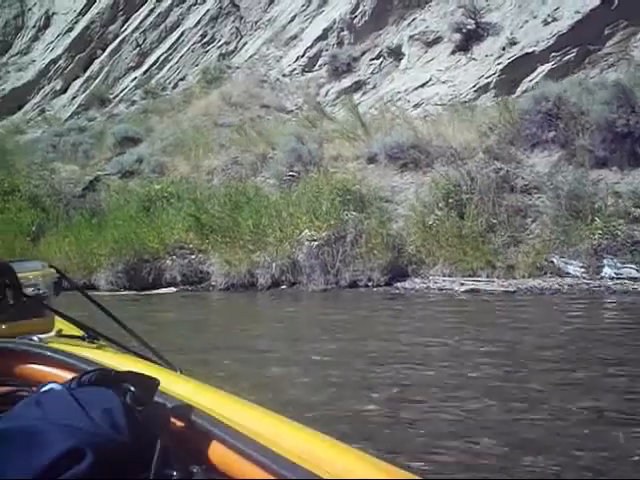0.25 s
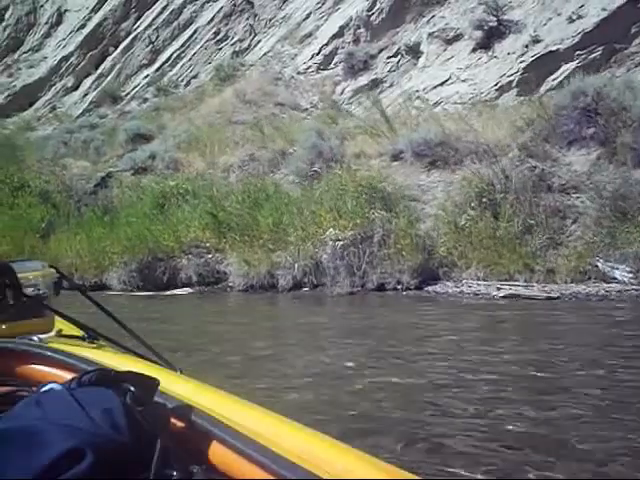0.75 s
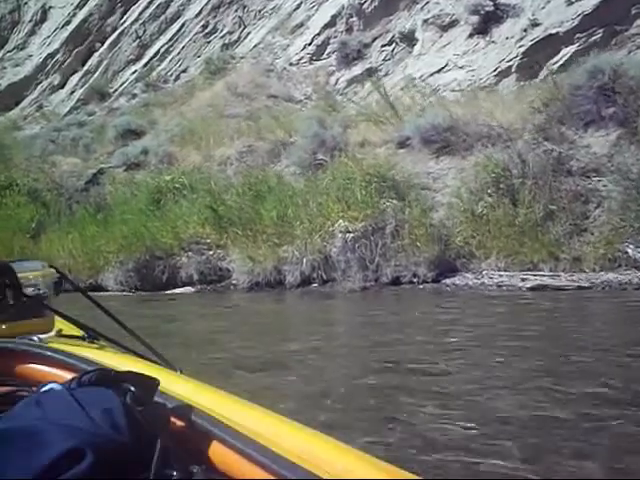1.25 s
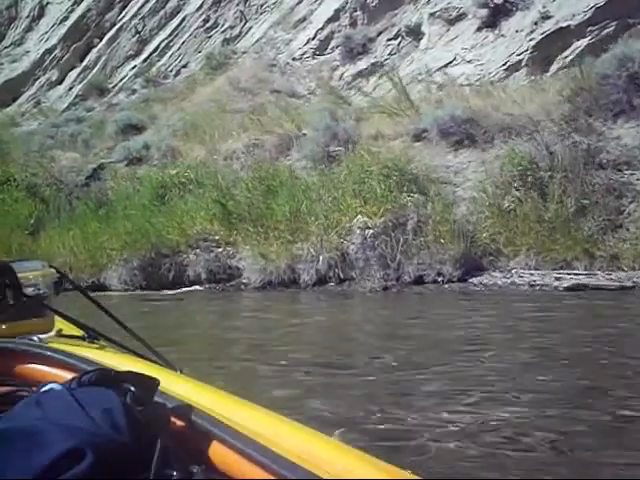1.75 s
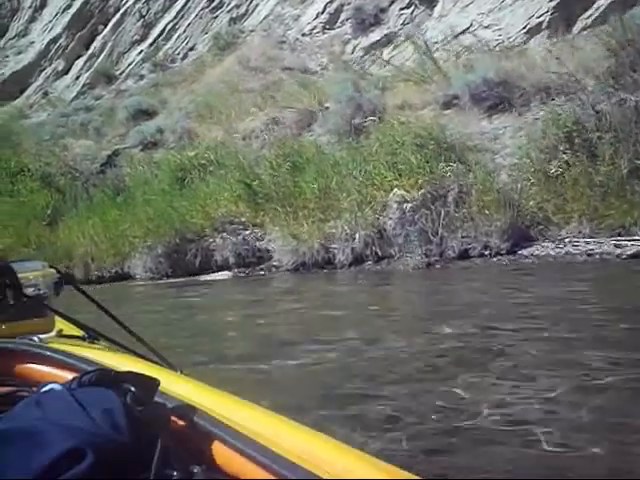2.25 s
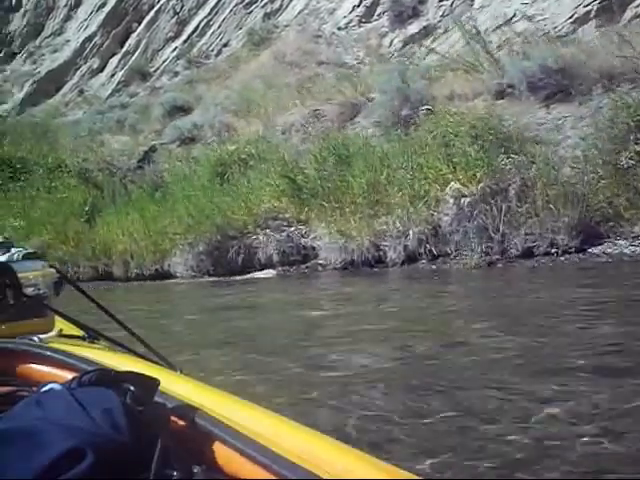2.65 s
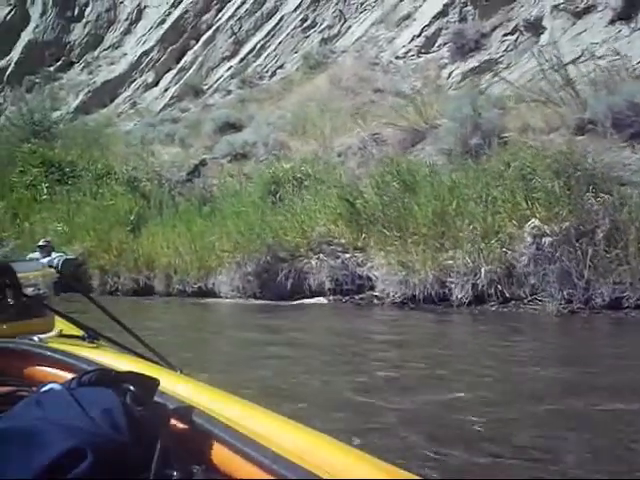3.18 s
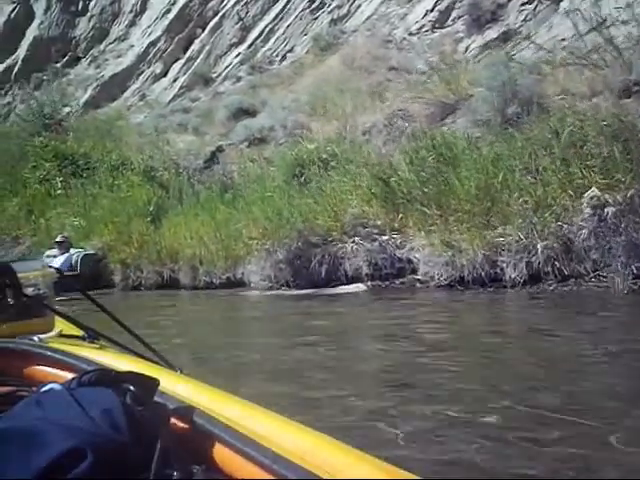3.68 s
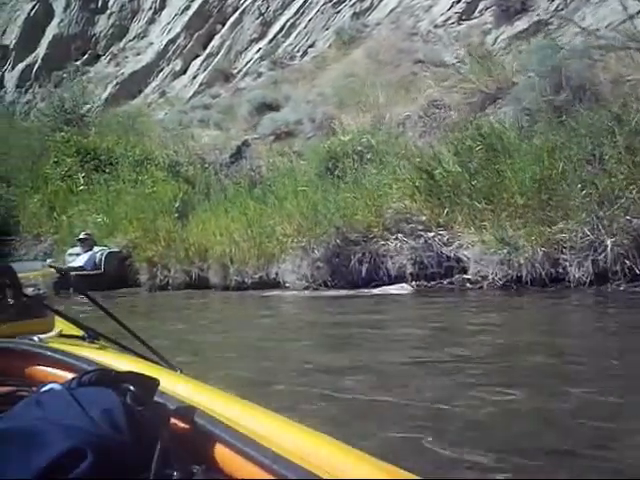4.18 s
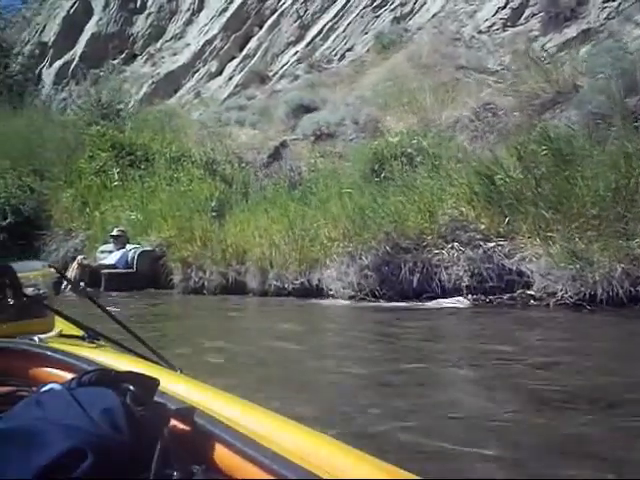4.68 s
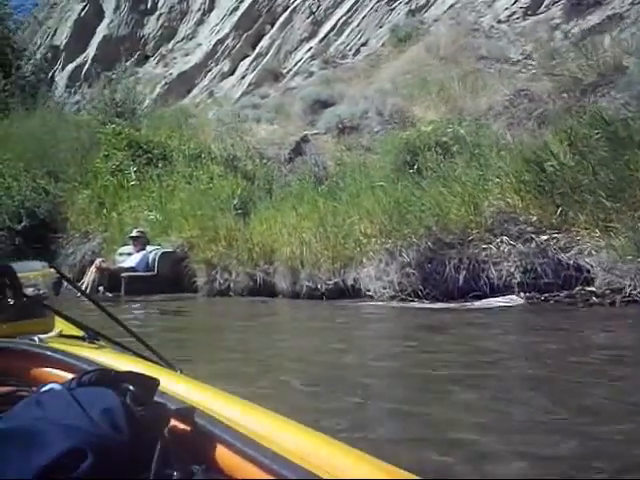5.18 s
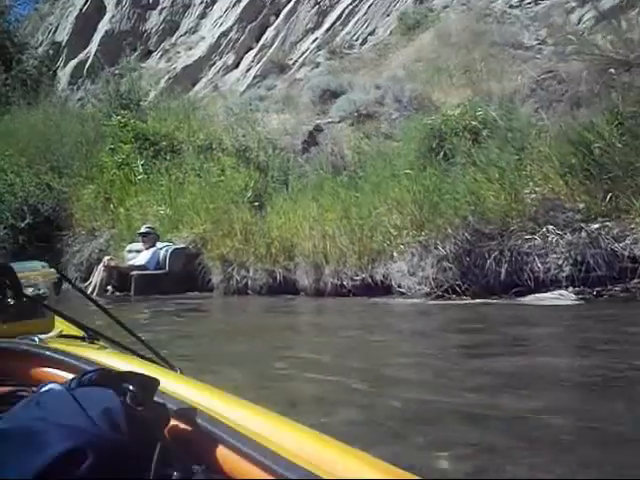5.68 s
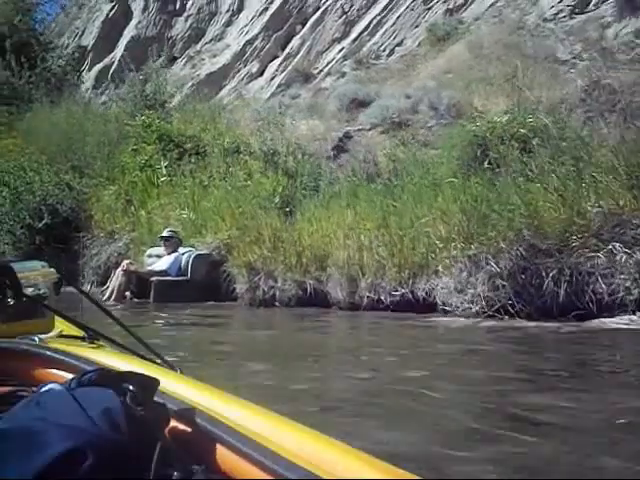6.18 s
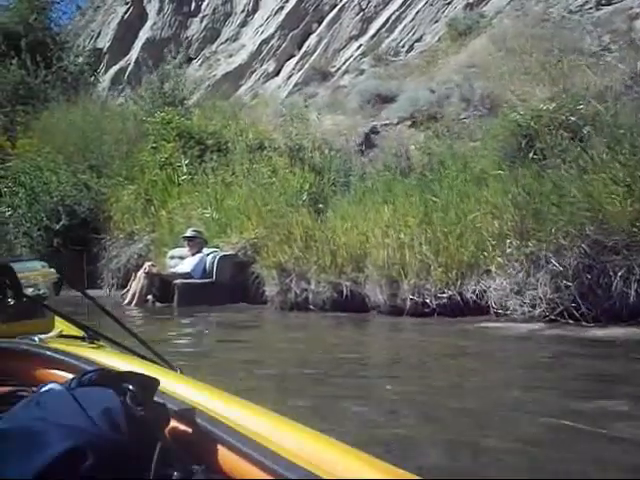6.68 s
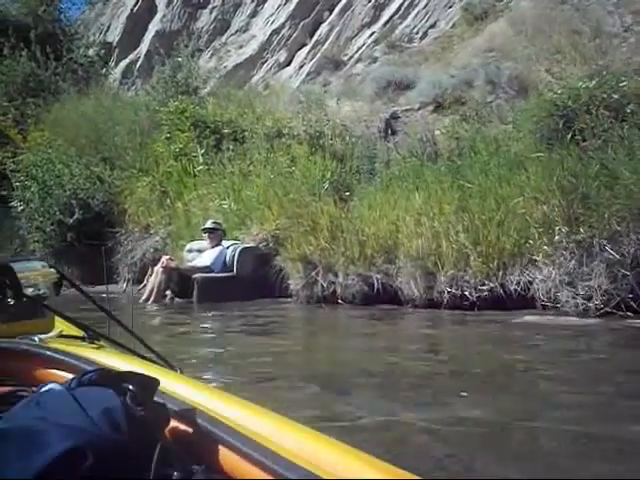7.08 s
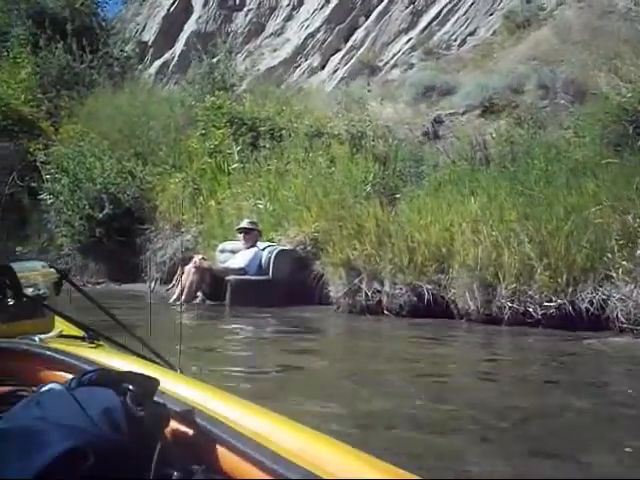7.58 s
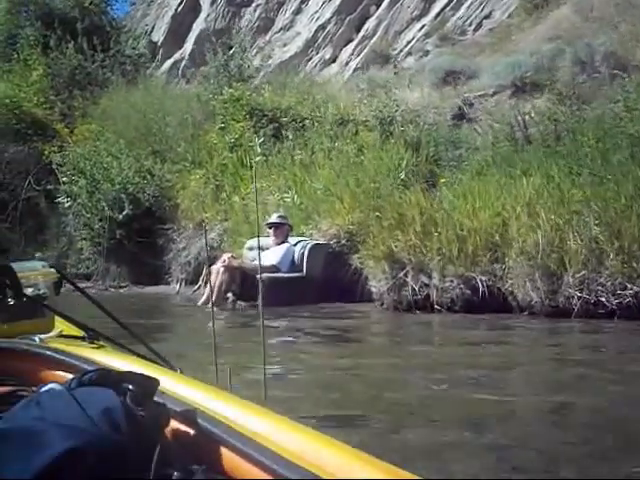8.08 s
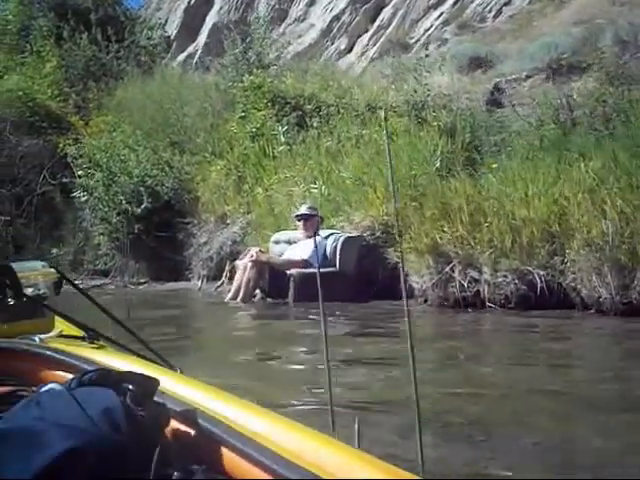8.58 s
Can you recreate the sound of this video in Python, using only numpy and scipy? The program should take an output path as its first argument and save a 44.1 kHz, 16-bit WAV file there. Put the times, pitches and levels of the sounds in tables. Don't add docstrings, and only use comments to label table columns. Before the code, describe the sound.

A continuous bed of low swell, soft slosh and fine trickle moves along a hollow plastic hull, close and muffled inside a small case that booms nasally. From 0 to 2.5 s the trickle is brighter, with plinking bubbles, sharp droplet snaps near 0.45 and 0.8 s, and light knocks around 0.8, 2.2 and 2.5 s; tiny digital ticks pepper it. A metal clip cracks and rings high at 3.55 s, fading in about a third of a second, followed by a deep soft bump at 3.75. Slosh strengthens; a double knock at 4.3, another at 4.7, then a splashing cluster of knocks, gulps and hull boom at 4.9-5.3. A sharp tap comes at 5.6, a wet flurry at 6.55-6.75, and a hard clack at 7.3. The heaviest hollow blow hits at 7.93 with rattling rebounds, then a last knock at 8.2 and quiet lapping until about 8.85.

```python
import sys
import numpy as np
from scipy import signal
from scipy.fft import rfft, irfft, next_fast_len
from scipy.io import wavfile
from scipy.ndimage import map_coordinates

SR = 44100
rng = np.random.default_rng(int(sys.argv[2]) if len(sys.argv) > 2 else 0)


def to_wav(s):
    ch = np.atleast_2d(s).T
    pcm = np.round(np.clip(ch, -1, 1) * 32767)
    wavfile.write(sys.argv[1], SR, pcm.astype(np.int16))


def to_linear_factor(level_db):
    exponent = np.asarray(level_db, float) / 20
    return 10 ** exponent


N = 390279


def unit(x):
    return x / np.sqrt(np.mean(x ** 2) + 1e-20)


def along(points):
    f, db = np.transpose(points)
    return lambda hz: to_linear_factor(np.interp(np.log(hz + 1), np.log(f + 1), db))


def modes(peaks):
    def response(f):
        total = 0
        for k, (centre, width, db) in enumerate(peaks):
            damping = 1j * f * width
            total = total + (-1) ** k * to_linear_factor(db) * damping / (centre * centre - f * f + damping)
        return total
    return response


def filtered(x, response):
    m = next_fast_len(N + SR // 2)
    return irfft(rfft(x, m) * response(np.fft.rfftfreq(m, 1 / SR)), m)[..., :N]


def wobble(rate):
    knots = rng.standard_normal(int(N * rate / SR) + 4)
    return map_coordinates(knots, [np.arange(N) * rate / SR], order=1)


def rings(s, db, hz, t60, rise, attack, size):
    s, db, hz, t60 = (np.asarray(v, float)[:, None] for v in (s, db, hz, t60))
    t = np.arange(size) / SR
    envelope = to_linear_factor(db - 60 * t / t60) * (1 - np.exp(-t / attack))
    wave = envelope * np.sin(2 * np.pi * hz * t * (1 + rise * t / t60))
    at = np.round(s * SR).astype(int) + np.arange(size)
    return np.bincount(at.ravel(), wave.ravel(), N + size)[:N]


# resonance in Hz, width in Hz, level in dB over flat.
CASE_AIR = [(643.4, 58.7, 9), (779, 65, -5)]


def case(calm, lumpy):
    def ringing(hz):
        return np.prod([1 + modes([peak])(hz) for peak in CASE_AIR], axis=0) - 1
    return calm + filtered(lumpy, ringing)


# crest in seconds, strength in dB, fall in dB per second.
LAPS = [(.3, -67, 41), (.67, -54, 106), (.84, -51.5, 83), (1.01, -63, 70), (1.36, -60, 120), (1.5, -62, 27),
        (1.9, -58.5, 25), (2.22, -52.5, 74), (2.51, -53, 40), (2.8, -54, 13.5), (3.03, -54.5, 18),
        (3.6, -55.5, 82), (3.75, -50.5, 58.5), (3.87, -49.5, 120), (4.04, -50, 88.5), (4.29, -45.5, 95),
        (4.7, -43.5, 71), (5.06, -41, 35), (5.36, -51, 38), (5.89, -45, 100), (6.16, -51, 50.5),
        (6.41, -55, 78), (6.7, -49, 19), (7.15, -51.5, 26), (7.6, -54, 11.5), (7.97, -36, 128),
        (8.13, -44, 42), (8.4, -48.5, 78), (8.65, -51.5, 24)]
LAP_RISE_DB_PER_S, CALM_DB = 220.5, -65


def laps_db(s):
    crest, db, fall = np.transpose(LAPS)[..., None]
    level = db - np.where(s < crest, LAP_RISE_DB_PER_S * (crest - s), fall * (s - crest))
    return 10 * np.log10(to_linear_factor(2 * level).sum(axis=0) + to_linear_factor(2 * CALM_DB))


# time in seconds, wavelet strength in dB, trickle flow in dB.
WATER_FLOW = [(0, -63, -65.5), (.5, -62, -62.5), (.84, -62, -60.5), (.96, -63.5, -64.5), (1.2, -63, -62.5),
              (2.4, -61.5, -63.5), (2.75, -62, -65.5), (3.05, -60.5, -60), (3.3, -62, -60),
              (3.72, -58.5, -66.5), (3.93, -56, -71), (5.25, -57.5, -67), (5.4, -56, -72),
              (6.2, -56.5, -75.5), (6.5, -55.5, -69.5), (6.85, -55.5, -72), (7, -56, -70),
              (8.85, -56.5, -73.5)]
SPLASH_FROM_DB, SPLASH_FOLLOWS = -46, 0.75


def slosh_db(s):
    splash = SPLASH_FOLLOWS * np.clip(laps_db(s) - SPLASH_FROM_DB, 0, None)
    return np.interp(s, *np.transpose(WATER_FLOW)[:2]) + splash


# time in seconds, swell in dB.
ROCKING = [(0, -59), (.9, -61.5), (1.1, -65), (2, -62.5), (2.8, -62.5), (3.7, -55), (4, -62), (4.8, -59.5),
           (5.7, -63), (6.6, -60), (7.2, -61), (8.1, -61), (8.85, -65.5)]
# frequency in Hz, density in dB per Hz.
SWELL_COLOUR = [(6, -4.5), (18, 1.5), (32, -3.5), (60, -8.5), (120, -14), (250, -28.5), (500, -59)]
SLOSH_COLOUR = [(60, -5.5), (150, -1), (250, -3.5), (500, -7), (1000, -12), (1500, -13), (2500, -18.5),
                (3800, -19.5)]
TRICKLE_COLOUR = [(900, -29), (1600, -8.5), (2300, -2.5), (3000, -3), (3500, -1), (3800, -3.5), (4100, -16),
                  (4600, -16)]
# resonance in Hz, width in Hz, level in dB.
HULL_BOOM = [(64, 16, 0), (104, 37, -8)]
SWELL_FOLLOWS = 0.2


def water():
    t, coarse = np.arange(N) / SR, np.arange(0, N + 200, 200) / SR
    boom_db = np.interp(t, coarse, laps_db(coarse))
    wash_db = np.interp(t, coarse, slosh_db(coarse))
    swell_db = np.interp(t, *np.transpose(ROCKING)) + SWELL_FOLLOWS * (boom_db - CALM_DB)
    trickle_db = np.interp(t, *np.transpose(WATER_FLOW)[[0, 2]])
    noise = rng.standard_normal((4, N))

    swell = unit(filtered(noise[0] * to_linear_factor(3.6 * wobble(9)), along(SWELL_COLOUR)))
    boom = filtered(noise[1] * to_linear_factor(3.0 * wobble(14)), modes(HULL_BOOM))
    boom = unit(filtered(boom, modes([(72, 120, 0)])))
    wavelets = filtered(noise[2], along(SLOSH_COLOUR)) * to_linear_factor(1.4 * wobble(12))
    slosh = unit(case(wavelets * to_linear_factor(0.76 * wobble(70)), wavelets * to_linear_factor(4.3 * wobble(45))))

    when, pitch, size, life = rng.random((4, 1400))
    hz = 2000 + 1900 * pitch ** .7
    bubble_db, bubble_t60 = -4 * np.log(0.03 + size), (12 + 30 * life) / hz
    bubbles = rings(when * N / SR, bubble_db, hz, bubble_t60, rise=0.04, attack=0.00062, size=800)
    hiss = filtered(noise[3] * to_linear_factor(3.0 * wobble(30)), along(TRICKLE_COLOUR))
    fizz = unit(unit(hiss) + 0.61 * unit(bubbles))

    low = to_linear_factor(swell_db + 7.0) * swell + to_linear_factor(boom_db - 3.5) * boom
    return low + to_linear_factor(wash_db + 4.0) * slosh + to_linear_factor(trickle_db + 3.0) * fizz


def spray():
    when, pitch, size = rng.random((3, 260))
    s, hz = when * N / SR, 900 * 3.6 ** pitch
    db = 1.3 * (slosh_db(s) + 56.5) - 65.0 - 4 * np.log(.04 + size)
    return rings(s, db, hz, 45 / hz, rise=0.073, attack=.001, size=2200)


# start in seconds, length in seconds, level in dB.
SPLASHES = [
    (0.384, 0.15, -65),
    (0.751, 0.17, -64),
    (2.059, 0.13, -60),
    (4.276, 0.17, -54),
    (4.549, 0.18, -57),
    (4.829, .12, -57),
    (5.019, .3, -48),
    (6.558, 0.3, -47.5),
    (7.958, 0.15, -50.5),
]
SPLASH_LOW_HZ, SPLASH_SPAN, SPLASH_CYCLES = 700, 5, 8.2


def splashes():
    start, length, db = np.transpose(SPLASHES)[..., None]
    when, pitch, size = np.moveaxis(rng.random((len(SPLASHES), 60, 3)), 2, 0)
    s = (start + length * when).ravel()
    hz = (SPLASH_LOW_HZ * SPLASH_SPAN ** pitch).ravel()
    level = (db - 5 * when - 4 * np.log(.04 + size)).ravel()
    return rings(s, level, hz, SPLASH_CYCLES / hz, rise=.05, attack=0.00044, size=900)


# start in seconds, peak in dB, pitch in Hz, t60 in seconds.
DROPS = [(0.0862, -51.5, 2240, 0.016), (0.3024, -51, 2130, 0.027), (0.4079, -47, 2440, 0.015),
         (0.4539, -37, 2240, 0.011), (0.519, -51, 2800, 0.028), (0.8855, -47, 3380, 0.025),
         (1.309, -48.5, 2463, 0.03), (1.441, -50.5, 2840, 0.027), (1.5703, -51.5, 3350, 0.029),
         (1.6082, -51.5, 2720, 0.026), (2.0892, -40.5, 3480, 0.0095), (2.3286, -50, 2720, 0.022),
         (4.129, -53.5, 2960, 0.029), (4.2113, -49.5, 3010, 0.034), (4.568, -47.5, 2790, 0.038),
         (5.634, -43, 2820, 0.016), (7.634, -56.5, 2790, 0.036), (7.8476, -53.5, 2850, 0.028)]
GULPS = [(0.709, -57.5, 1270, 0.06), (1.975, -54.5, 890, 0.059), (4.318, -45, 1646, 0.035),
         (4.373, -52, 1206, 0.051), (4.418, -50, 1500, 0.056), (4.875, -51, 1620, 0.044),
         (4.941, -39, 1100, 0.026), (5.129, -51, 1144, 0.045), (5.26, -56.5, 1565, 0.04),
         (6.716, -52, 1220, 0.048), (6.823, -50, 1470, 0.044), (7.627, -47.5, 1620, 0.039),
         (4.356, -43.5, 478, 0.093), (5.17, -50.5, 376, 0.23)]


def drops():
    small = rings(*np.transpose(DROPS), rise=0.025, attack=0.00044, size=3000)
    large = rings(*np.transpose(GULPS), rise=.03, attack=0.0014, size=5000)
    return to_linear_factor(6.5) * small + to_linear_factor(4.0) * large


# start in seconds, peak in dB, brightness in dB per octave.
SNAPS = [(0.4377, -38, 4), (0.4539, -39.5, 5), (0.6814, -39, 2), (0.7816, -33.5, 10.5), (0.8452, -40, 8),
         (0.884, -35.5, 2), (.9061, -47, 8), (2.0894, -40, -4), (2.191, -43, 8), (2.5233, -37, 9),
         (4.2113, -46, 0), (4.8385, -49, -1), (4.8924, -35.5, 3.5), (4.9402, -52.5, 0), (5.0263, -50, -2),
         (5.0654, -50, 1), (5.1474, -42, 1), (5.219, -36, -3), (5.26, -52, -2), (6.569, -46, -4),
         (6.7136, -50, -1), (7.9813, -33, -5), (8.0334, -43, -4)]
SNAP_HZ = [1500, 2220, 2900, 3605]
SNAP_DB, SNAP_T60_S = -1, 0.0058


def snaps():
    s, db, bright_db = np.transpose(SNAPS)
    spread = rng.standard_normal((len(s), 2, len(SNAP_HZ)))
    t60 = np.full(len(s), SNAP_T60_S)
    out = 0
    for k, hz in enumerate(SNAP_HZ):
        level = db + SNAP_DB + bright_db * np.log2(hz / SNAP_HZ[2]) + 1.8 * spread[:, 0, k]
        pitch = hz * (1 + 0.086 * spread[:, 1, k])
        out = out + rings(s + .0004, level, pitch, t60, rise=0, attack=0.00035, size=600)
    return out


# start in seconds, peak in dB, pitch in Hz, t60 in seconds.
BUMPS = [(2.516, -34, 59.6, 0.062), (3.739, -24.5, 20.9, 0.19), (3.739, -46, 60, .06),
         (5.038, -38, 73, 0.42), (5.097, -32, 67.8, 0.85), (5.072, -39, 104, 0.15),
         (7.9384, -18, 98.6, 0.13), (7.9391, -34, 193, .07), (7.9605, -28, 55.7, 0.1),
         (7.976, -21.5, 67.2, 0.069), (7.9945, -33.5, 97, 0.3)]


def bumps():
    return -rings(*np.transpose(BUMPS), rise=-0.18, attack=0.0011, size=14000)


# start in seconds, peak in dB, pitch in Hz, t60 in seconds.
PINGS = [(4.282, -41, 1296, 0.061), (4.687, -42.5, 700, 0.036), (4.695, -35.5, 707, 0.042),
         (4.874, -46, 700, .04), (4.939, -46, 730, 0.036), (5.033, -53, 1250, .05), (5.067, -55, 1470, .04),
         (5.104, -51, 1400, .045), (5.129, -51, 1490, 0.065), (5.147, -50, 1100, .04),
         (5.219, -52.5, 1260, 0.036), (6.535, -58, 1660, 0.03), (6.557, -46.5, 1155, 0.036),
         (6.557, -49, 2960, 0.033), (6.569, -43, 1066, 0.054), (6.575, -49, 3000, .04),
         (6.6355, -56, 1530, .05), (6.733, -54, 1380, 0.044), (6.765, -57, 1200, .05),
         (6.76, -55, 3150, .04), (6.817, -54.5, 2900, .04), (6.8615, -56, 950, 0.038),
         (7.288, -38.5, 1214, 0.036), (7.291, -37, 1615, 0.049), (7.291, -39, 1760, 0.028),
         (7.299, -47, 710, 0.052), (7.327, -51.5, 640, 0.12), (7.393, -43.5, 676, 0.068),
         (7.929, -37, 700, .04), (7.945, -45, 1236, 0.055), (7.98, -38, 1614, 0.036),
         (8.012, -57, 1590, 0.042), (8.033, -48.5, 1640, .04), (8.158, -48, 624, .08),
         (8.199, -49, 632, 0.06), (8.251, -50, 636, .08), (3.87, -56, 717, 0.052), (4.04, -51, 720, 0.065),
         (4.318, -44, 1910, 0.028), (4.357, -45.5, 700, 0.042), (4.84, -49, 700, 0.041),
         (5.009, -48, 684, 0.053), (5.058, -48, 680, 0.044), (5.127, -43, 674, .05),
         (5.17, -48, 678, 0.077), (5.193, -44.5, 682, 0.07), (5.237, -49, 716, .05),
         (5.285, -54, 2900, 0.043), (4.285, -40, 763, 0.051), (8.033, -48, 700, 0.056),
         (.757, -56, 670, 0.023), (4.33, -49, 654, .06), (4.808, -50, 666, 0.037), (4.892, -43, 657, 0.041),
         (5.26, -52, 680, .06), (5.275, -56, 2950, .03), (5.3, -58, 3150, 0.037), (8.048, -44, 653, 0.075),
         (8.09, -51, 650, 0.066), (8.218, -43.5, 663, 0.034), (2.176, -50, 96, 0.1), (2.235, -51, 70, .15),
         (2.625, -54.5, 860, 0.044), (2.135, -57, 665, .05)]


def pings():
    return to_linear_factor(5.5) * rings(*np.transpose(PINGS), rise=0, attack=0.0017, size=5000)


# start in seconds, peak in the case in dB, deck in dB, hard edge in dB.
KNOCKS = [(0.756, -41, -15, -21), (0.931, -45.5, -16, -18), (2.163, -42.5, -20, -25),
          (2.206, -42, -14, -15), (2.522, -45, -21, -1.5), (3.085, -43, -16, -7.5), (4.279, -33, -3, -8),
          (4.299, -38, -10, -12), (4.55, -39, -19, -20), (4.693, -31.5, -20, -33), (4.839, -41, -20, -12.5),
          (4.891, -42.5, -7, 1.5), (4.938, -47, -4, -13), (5.042, -42, -12, -19), (5.061, -43.5, -13, -10),
          (5.093, -34, -17, -24), (5.106, -30, -21, -28), (5.218, -47, -4, 0), (5.635, -47, -8, 0),
          (6.554, -43, -3.5, -22.5), (6.569, -29.5, -14.5, -26), (6.6, -36, -17, -24),
          (6.611, -30.5, -27, -25.5), (6.639, -45.5, -14, -10), (6.677, -39, -17, -19),
          (6.722, -42, -8, -25), (7.288, -48.5, 14.5, 7.5), (7.369, -36, -19, -32.5),
          (8.219, -35.5, -25, -27)]
# start in seconds, peak in the case in dB, deck in dB, hard edge in dB, case pitch in Hz.
BLOW = [
    (7.932, -22.5, -15.5, -23.5, 686),
    (7.944, -28, -5.5, -16, 652),
    (7.959, -35, -10, -14, 660),
    (7.982, -32.5, -3.5, -8.5, 638),
    (8.034, -36.5, -13, -19, 650),
    (8.074, -37, -29, -27, 643),
]
# resonance in Hz, width in Hz, level in dB.
WALL = [(215, 62, -2.5), (387, 74, 5)]
DECK = [(1030, 160, -8.5), (1265, 140, 1.5), (1610, 130, 2), (2100, 150, -3)]
HARD_EDGE = [(2820, 430, 5.5), (3630, 890, -2.5), (4620, 760, -2.5)]
KNOCK_T60_S, BLOW_LID_DB = 0.043, -4.5
WALL_DB, WALL_FOLLOWS, BLOW_WALL_DB = -55, 0.52, -7.5


def steep(body):
    centre = np.mean(body, axis=0)[0]
    return lambda hz: modes(body)(hz) * modes([(centre, 1.3 * centre, 0)])(hz)


def knocks():
    contacts = [(*row, WALL_DB - row[1] + WALL_FOLLOWS * (row[1] + 42)) for row in KNOCKS]
    contacts += [(*row[:4], BLOW_WALL_DB) for row in BLOW]
    force, t = np.zeros((3, N + 4000)), np.arange(4000) / SR
    envelope = to_linear_factor(-60 * t / KNOCK_T60_S) * (1 - np.exp(-t / .0022))
    for start, peak_db, deck_db, edge_db, wall_db in contacts:
        scrape = envelope * rng.standard_normal((3, len(t)))
        level = peak_db + np.array([[wall_db + 22.5], [deck_db + 19.0], [edge_db + 16.5]])
        at = round((start - .001) * SR)
        force[:, at:at + len(t)] += to_linear_factor(level) * scrape

    s, db, *_ = np.transpose(contacts)
    t60 = np.full(len(s), KNOCK_T60_S)
    detune = rng.standard_normal((len(s), 2))
    pitch = np.r_[CASE_AIR[0][0] + 20 * detune[:len(KNOCKS), 0], [row[-1] for row in BLOW]]
    out = rings(s, db + 1.0, pitch, 1.15 * t60, rise=0, attack=.002, size=6000)
    lid_db = db - 13.0 + BLOW_LID_DB * (np.arange(len(s)) >= len(KNOCKS))
    for hz in (490, 790):
        out = out + rings(s, lid_db, hz + 40 * detune[:, 1], t60, rise=0, attack=.002, size=4000)
    for push, body in zip(force, (WALL, DECK, HARD_EDGE)):
        out = out + filtered(push[:N], steep(body))
    return out


CLIP_STRUCK = [(1525, -36, 0.064), (1136, -39, 0.05), (980, -32, .02), (724, -25, 0.035), (630, -32, 0.072),
               (497.5, -32, 0.043), (300, -35, 0.043), (230.5, -41.5, 0.057)]
CLIP_CRACK = [(1739, 2, .0075), (1942, 2.9, .0108), (2432, -9, .022), (3024, -2.7, .015), (3206, -6, .0063)]
RING_HZ = [2638, 1729, 2440]
# level in dB, t60 in seconds.
RING_DECAY = [(-19, 0.32), (-36.5, 0.36), (-47.5, .3)]
CLIP_S, RING_ATTACK_S = 3.55576, .0029
CRACK_LAG_S, REBOUND_S, REBOUND_DB = 0.00077, 0.00182, -5.7


def struck(partials, start, attack, size):
    hz, db, t60 = np.transpose(partials)
    return rings(np.full(len(hz), start), db, hz, t60, rise=0, attack=attack, size=size)


def clip():
    crack = struck(CLIP_CRACK, CLIP_S + CRACK_LAG_S, attack=0.0039, size=1000)
    crack = crack + to_linear_factor(REBOUND_DB) * np.roll(crack, round(REBOUND_S * SR))
    partials = [(hz, *row) for hz, row in zip(RING_HZ, RING_DECAY)]
    long = struck(partials, CLIP_S, attack=RING_ATTACK_S, size=22000)
    return struck(CLIP_STRUCK, CLIP_S, attack=0.0014, size=5000) - crack - long


def scene():
    lake = water() + spray() + splashes() + drops() + snaps()
    contacts = bumps() + pings() + knocks() + clip()
    return np.tile(lake + contacts, (2, 1))


# time in seconds, peak in dB.
TICKS = [(0.5641, -62.5), (0.7836, -74), (0.8462, -60), (1.221, -65.5), (1.4396, -65), (1.4712, -59),
         (1.5018, -61), (1.6886, -70), (1.72, -67), (1.907, -64), (2.0632, -65), (2.0956, -61.5),
         (2.2189, -66), (2.2508, -65), (2.313, -64), (2.3446, -64), (2.5316, -72), (2.75, -62),
         (2.7806, -64), (2.8753, -61), (2.9993, -57), (3.0929, -59), (3.4976, -59.5), (3.717, -58),
         (3.7485, -62), (0.035, -66), (2.7907, -70)]
# time in seconds, peak in dB.
SPILLS = [
    (4.281, -84),
    (4.8904, -79),
    (5.085, -84),
    (5.635, -83),
    (7.935, -77),
    (7.99, -83),
]
# frequency in Hz, level in dB.
TICK_COLOUR = [(600, -38), (2500, -7), (5000, 7.5), (9000, 1.5), (12500, 0), (13000, -65)]
SPILL_COLOUR = [(2500, -20.5), (4500, 8), (7000, 2.5), (9500, -12), (12000, -39.5)]


def ticks():
    out = 0
    for rows, colour in ((TICKS, TICK_COLOUR), (SPILLS, SPILL_COLOUR)):
        s, db = np.transpose(rows)
        height = to_linear_factor(db + 13.5) * rng.choice([-1, 1], len(s))
        clicks = np.bincount(np.round(s * SR).astype(int), height, N)
        out = out + filtered(clicks, along(colour))
    return out


# start in seconds, length in seconds, level in dB.
SPARE = [(0, .06, -64), (.31, .07, -80), (.55, .05, -77), (.64, .16, -90), (.97, .08, -87),
         (1.06, .19, -75), (1.4, .17, -81), (1.67, .33, -83), (2.04, .33, -71), (2.52, .14, -76),
         (2.74, .08, -84), (2.92, .06, -87), (3.08, .09, -91), (3.25, .08, -82), (3.59, .04, -84),
         (3.74, .1, -78)]
SHUT_DB, TICK_OPENS_DB, TICK_OPENS_S = -112, -29, 0.013


def spare_db(s):
    start, length, db = np.transpose(SPARE)[..., None]
    tick_s, tick_db = np.transpose(TICKS + SPILLS)[..., None]
    spells = np.where((s >= start) & (s <= start + length), db, SHUT_DB).max(axis=0)
    opened = np.where(abs(s - tick_s) < TICK_OPENS_S, tick_db + TICK_OPENS_DB, SHUT_DB).max(axis=0)
    return np.maximum(spells, opened)


# start in seconds, length in seconds, level in dB.
IMAGES = [(3.8, .1, -104), (3.97, .1, -113), (4.21, .16, -110), (4.43, .19, -111), (4.68, .03, -116),
          (5.02, .08, -110), (5.63, .05, -112), (5.85, .07, -112), (6.5, .03, -112), (6.78, .03, -111),
          (6.86, .09, -113), (7.14, .1, -110), (7.271, .06, -95), (7.62, .05, -116), (7.85, .05, -113),
          (7.95, .25, -109), (8.29, .05, -116), (8.49, .09, -112), (8.63, .03, -115), (8.78, .06, -116)]
# frequency in Hz, level in dB.
GRIT = [(60, -45), (300, -34), (650, -9.5), (3800, -11.5), (4500, 2.5), (5200, -31.5)]
IMAGE_GAPS, EDGE_SWAY_DB, TOP_HZ = .2, 2.8, 12800
HASH_DB, HASH_GAPS = -29.5, 0.22
CEILING_HZ, CEILING_SWAY_HZ = 10900, 1100


def starved(x, floor_db, sharp_db, loud_db):
    hz, s, z = signal.stft(x, SR, nperseg=2048)
    hz = hz[:, None]
    blur = abs(z) * np.exp(2j * np.pi * rng.random(z.shape))
    blur_phase = np.exp(1j * np.angle(blur))
    starts = np.r_[0:240:6, 240:1025:24]
    band = np.searchsorted(starts, np.arange(1025), "right") - 1
    width = np.diff(np.r_[starts, 1025])[:, None]
    power = (np.add.reduceat(abs(z) ** 2, starts) / width)[band]
    luck = rng.standard_normal((2, band[-1] + 1, len(s)))[:, band]
    luck = luck[..., np.arange(len(s)) // 2 * 2]

    bits_db = spare_db(s) + 94.0
    above = hz > 4150
    edge_sway = 2.5 * luck[0] + EDGE_SWAY_DB * luck[1, 0] + 9
    threshold_db = floor_db + np.where(above, 7 * luck[0] - .9 * bits_db, edge_sway)
    kept = power > to_linear_factor(2 * threshold_db)
    sharp = abs(z[50:]).max(axis=0) > to_linear_factor(sharp_db)
    below_ceiling = hz < CEILING_HZ + CEILING_SWAY_HZ * luck[0, 0]
    mid = np.where(above & ~sharp, blur, z) * np.where(hz > 3450, kept | sharp, 1)
    mid = mid * (sharp | below_ceiling) * (hz < TOP_HZ)

    blocks = (luck[1] > HASH_GAPS) & (bits_db > 3) & ~sharp & above & below_ceiling
    hash_level = to_linear_factor(np.minimum(bits_db, 14) - 95.0 + HASH_DB)
    mid = mid + blocks * hash_level * rng.standard_normal(z.shape) * blur_phase

    start, length, db = np.transpose(IMAGES)[..., None]
    image = np.where((s >= start) & (s <= start + length), to_linear_factor(db), 0).max(axis=0)
    image = image * (hz > 3750) * (hz < 4950) * (luck[0] > IMAGE_GAPS)
    mid = mid + image * rng.standard_normal(z.shape) * blur_phase

    quiet = power[9:].sum(axis=0) < to_linear_factor(2 * loud_db)
    grit = blur * along(GRIT)(hz) * (luck[1] > -.8) * quiet
    return signal.istft(np.array([mid, grit]), SR, nperseg=2048)[1][:, :N]


def band_limit(x):
    return signal.sosfilt(signal.butter(12, 13000, fs=SR, output="sos"), x)


# frequency in Hz, gain in dB.
CONVERTER_EDGE = [(20, 0), (3500, 0), (3800, -5), (4000, -12), (4300, -11), (4600, -16), (4900, -40),
                  (20000, -90)]
SLIP_DRIFT = [(0, 145), (30, 205), (65, 240), (95, 228), (113, 190), (114, 174), (115, 203), (117, 180),
              (122, 186)]
SLIP_EVERY, SLIP_COUNT = 1376, 123
STEP = SR / 8000


def record(dry):
    mono = filtered(dry[0], along(CONVERTER_EDGE))
    n, k = np.arange(N), np.arange(SLIP_COUNT)
    slips = k * SLIP_EVERY + np.interp(k, *np.transpose(SLIP_DRIFT))
    since = n - slips[np.clip(np.searchsorted(slips, n, "right") - 1, 0, None)]
    late = n >= slips[-1]
    ahead = np.where(late, 0, STEP * (since / SLIP_EVERY - .5))
    reading = [n + ahead - late * STEP / 2, n + ahead + late * STEP / 2]
    left, right = (map_coordinates(mono, [r], order=3, mode="nearest") for r in reading)
    mid, grit = starved((left + right) / 2, floor_db=-114, sharp_db=-64, loud_db=-45)
    mid = mid + ticks()
    side = (left - right) / 2 + grit * ~late
    return band_limit(np.array([mid + side, mid - side]))


dry = scene()
out = record(dry)
to_wav(out)
```